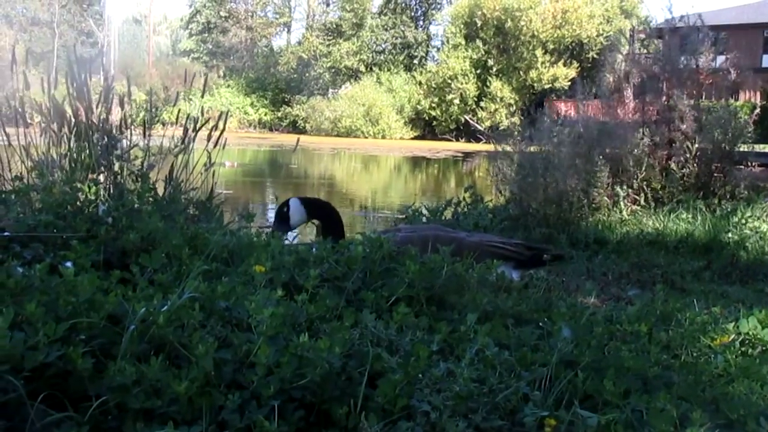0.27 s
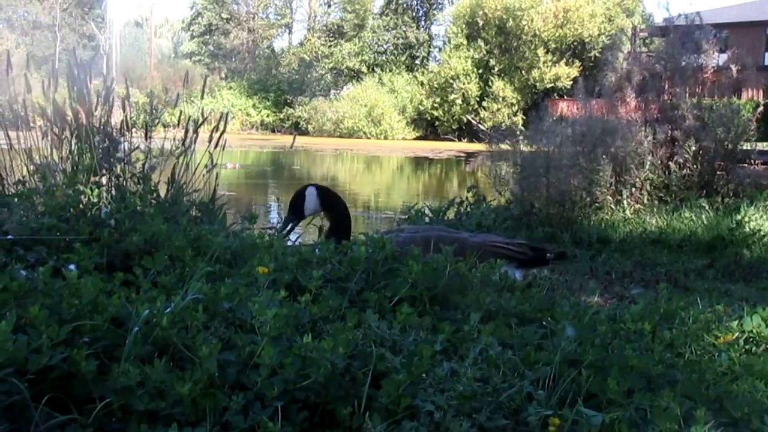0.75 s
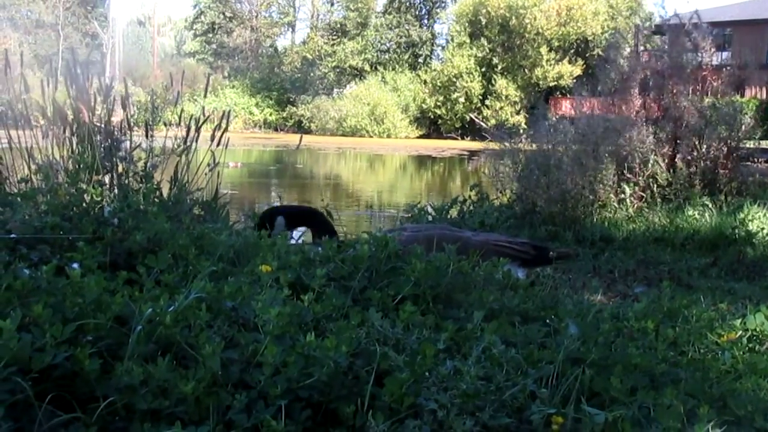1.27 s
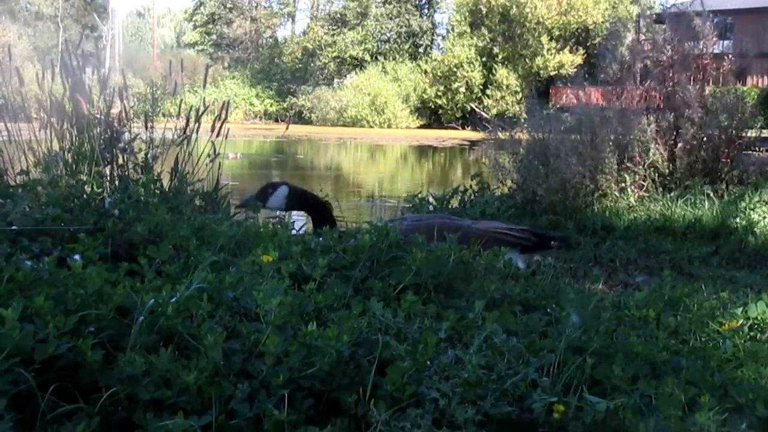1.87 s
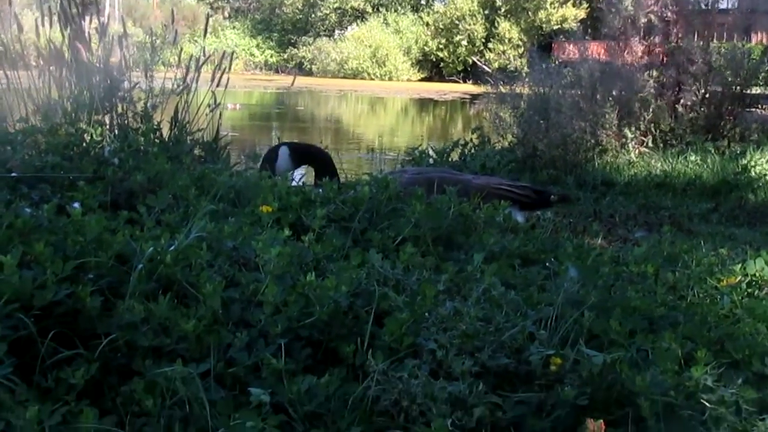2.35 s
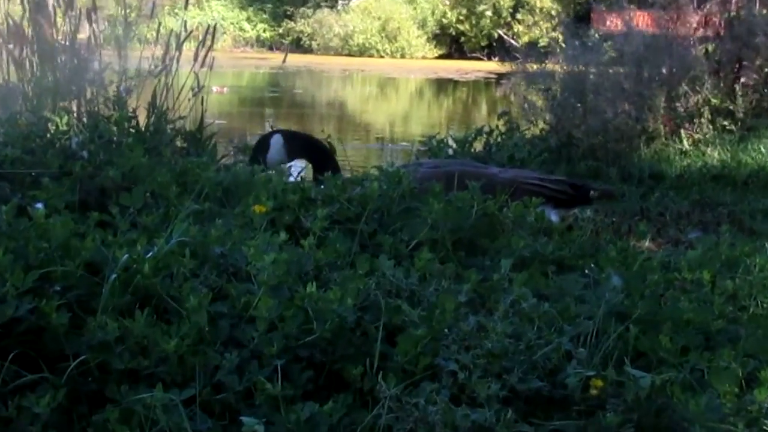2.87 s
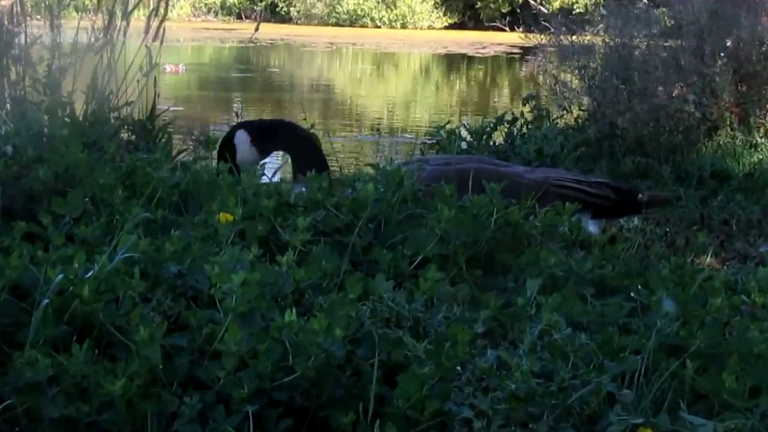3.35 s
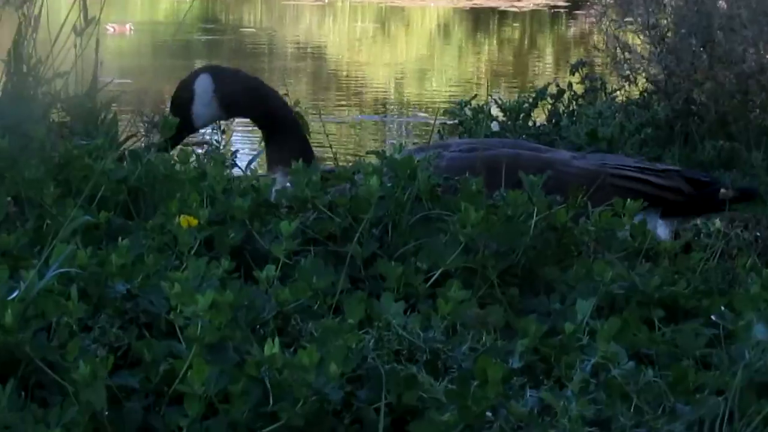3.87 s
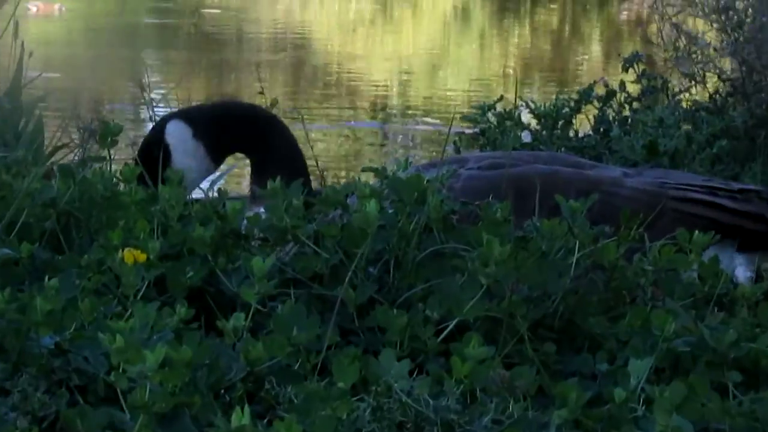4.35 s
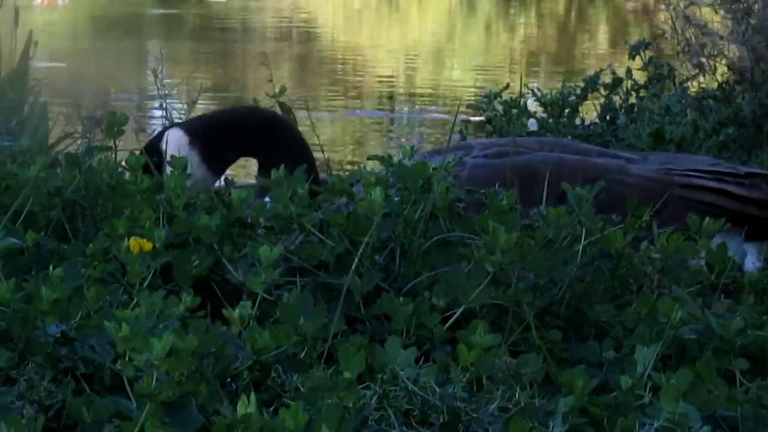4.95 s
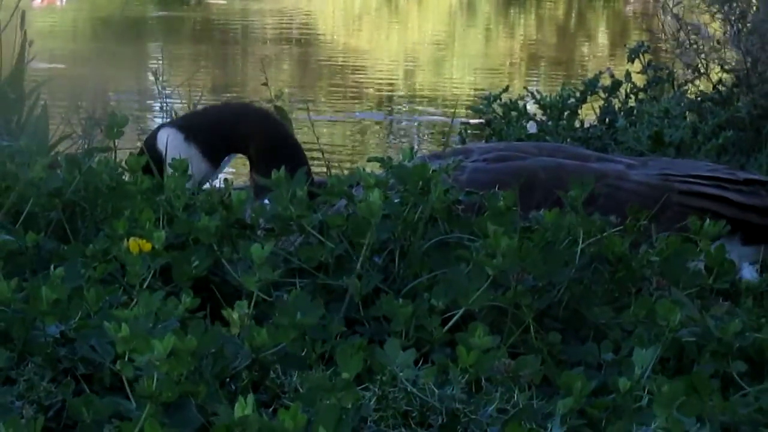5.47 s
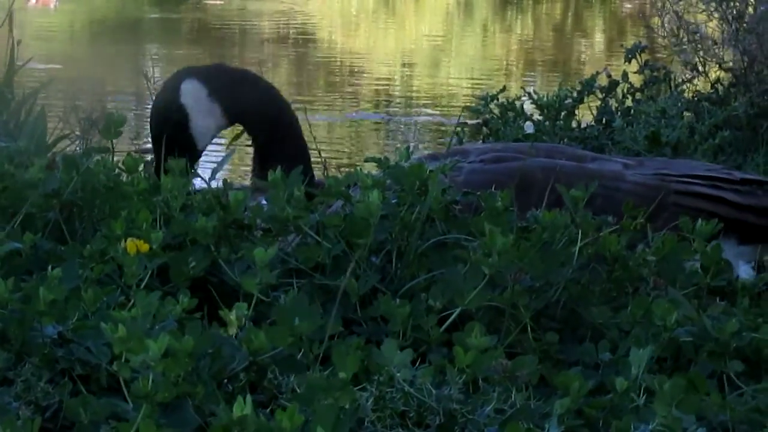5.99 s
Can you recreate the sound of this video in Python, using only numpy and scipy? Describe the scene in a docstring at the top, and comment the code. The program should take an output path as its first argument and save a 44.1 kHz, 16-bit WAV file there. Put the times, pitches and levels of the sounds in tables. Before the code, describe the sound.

Beside a pond, a far engine drones low and steady, creeping up in pitch over road rumble, leaves and hiss. A goose tears grass in tiny crackles. Around two seconds a finger brushes and clicks the camera, and its zoom motor buzzes faintly for two seconds. The engine drops in pitch, and wind finally thumps the left microphone.

```python
"""An engine drones far away, climbs slowly and drops its speed: two sine tones locked to one speed curve.
Wind bumps two microphone ports as drifting noise and ends in a hard gust on the left that ducks the limiter.
A finger brushes the camera (hiss), knocks the zoom lever (ringing bursts); the zoom motor buzzes for two
seconds (pulsed, resonant noise). A goose grazes: small crackly bursts of bright noise.
Behind lie traffic wash, leaves, low road rumble and a thin hiss, all shaped noise."""
import sys
import numpy as np
from scipy import signal
from scipy.fft import rfft, irfft
from scipy.io import wavfile
from scipy.ndimage import map_coordinates

SR = 44100
rng = np.random.default_rng(int(sys.argv[2]) if len(sys.argv) > 2 else 0)


def put_to_file(sound):
    """Save the sound as 16-bit audio at rate SR, in the file named by the first command-line argument."""
    columns = np.atleast_2d(sound).T  # one column per channel
    safe = np.clip(columns, -1, 1)
    whole_steps = np.round(safe * 32767)
    wavfile.write(sys.argv[1], SR, whole_steps.astype(np.int16))


N = 274302
TIME, FREQ = np.arange(N) / SR, np.fft.rfftfreq(N, 1 / SR)  # seconds, Hz

# How alike the two ports hear far sound. Each row: frequency in Hz, likeness from 0 to 1.
PORT_LIKENESS = [(30, 1), (130, 0.96), (300, 0.8), (640, 0.65), (1400, 0.32), (3000, 0), (15000, 0.2)]


def engine():
    """Two exhaust orders follow one speed and fade in the moving air; steadier machines hum behind."""
    # Main drone as the air carries it. Each row: time in seconds, level in dB.
    drone_points = [(.35, -29), (.55, -35.5), (1.4, -32), (2.15, -25.5), (2.55, -32), (3.25, -32.5),
                    (3.5, -39), (3.65, -27), (4.3, -32.5), (4.7, -28), (5.05, -30.5), (6.1, -35)]
    # Lower exhaust order. Each row: time in seconds, level in dB.
    lower_points = [(1.4, -47.5), (2.2, -30), (2.9, -44), (3.9, -29), (4.4, -34), (5.4, -30)]
    # Other machinery far off. Each row: pitch in Hz, early level in dB, late level in dB.
    far_tones = [(39, -47, -48), (111, -43, -48), (157, -56, -41), (230, -56, -46)]
    lower_ratio = 0.635  # pitch of the lower order against the main drone

    speed_wobble = 1 + 0.003 * wander(12)
    turns = np.cumsum(engine_hz() * speed_wobble) / SR
    drone_db = curves(drone_points)[0] + 0.9 * wander(7)
    lower_db = curves(lower_points)[0] + 2.95 * wander(6.4)
    out = amp(drone_db) * np.sin(2 * np.pi * turns)
    out += amp(lower_db) * np.sin(2 * np.pi * turns * lower_ratio)
    for tone_hz, early_db, late_db in far_tones:
        phase = 2 * np.pi * tone_hz * TIME + 0.7 * wander(2.4)
        tone_db = np.interp(TIME, [3.4, 4.4], [early_db, late_db]) + 2.5 * wander(3)
        out += amp(tone_db) * np.sin(phase)
    return out * pan(0.99)


def engine_hz():
    """Pitch of the main drone: a steady climb, then throttled back to coast down towards idle."""
    start_hz, climb_hz_per_s, idle_hz = 142.6, 5.5, 120.96
    throttle_s, coast_s, coast_shape = 3.74, 0.31, 2.3
    climb = start_hz + climb_hz_per_s * np.minimum(TIME, throttle_s)
    coasted = np.maximum(TIME - throttle_s, 0) / coast_s
    return idle_hz + (climb - idle_hz) / (1 + coasted ** coast_shape)


def wind():
    """Eddies drift past each port, sucking harder than they push; each port leaks inverted into the other."""
    # Colour of the eddies before they drift. Each row: frequency in Hz, density in dB per Hz.
    eddy_spectrum = [(12, 3), (45, -2), (110, 1), (180, -6.5), (300, -15.5), (500, -38.5), (1000, -40),
                     (2500, -72), (8000, -95)]
    # Hardest buffets on the left port. Each row: time in seconds, pressure in dB, half width in seconds.
    hard_buffets = [(5.778, -7, .0024), (5.845, -9, .0008), (5.95, -3, .0021), (5.9812, 5.5, .0016),
                    (6.074, 0, .0012), (6.0805, -8, .0004), (6.088, -1, .0007), (6.135, -8, .0006),
                    (6.145, -3, .001)]
    # smaller buffets come by chance while the wind on the left port is above the onset
    small_per_s, onset_db, small_db, small_width_s = 22, -19, -15, 0.001
    skew, leak = 0.21, 0.29

    pressure, speed = gusts()
    place = np.cumsum(speed)  # faster eddies read through the noise quicker, so they sound higher
    eddies = []
    for _ in range(2):
        still = noise(amp(read(eddy_spectrum)))
        eddies.append(map_coordinates(still, [place], order=3, mode="wrap"))
    flow = unit(np.tanh(np.array(eddies) / 3))
    flow = flow - skew * (flow ** 2 - 1)
    lumps = unit(amp(4.0 * np.tanh(wander(25))))
    ports = flow * pressure * lumps

    for s, db, width in hard_buffets:
        ports[0] += amp(db) * buffet(TIME - s, width)
    strong = pressure[0] > amp(onset_db)
    hits = (rng.random(N) < small_per_s / SR) * strong * rng.uniform(0.5, 1, N)
    small = buffet(np.arange(-0.01, 0.01, 1 / SR), small_width_s)
    ports[0] += amp(small_db) * signal.oaconvolve(hits, small, "same")
    return ports - leak * ports[::-1]


def gusts():
    """Each gust swells and dies over the light wind: pressure at both ports, and the speed of the eddies."""
    # Each row: centre in seconds, half length in seconds, level in dB, left minus right in dB,
    # eddy speed factor.
    gust_rows = [(0.162, 0.048, -23, -12.5, 0.61), (0.419, .1, -35, -10, 0.69),
                 (.79, 0.099, -23.5, -14.5, 0.76), (1.87, 0.076, -32, -8, 0.61), (2.08, .09, -36, 8, 0.58),
                 (3.761, .1, -38, 12, 0.52), (4.15, .05, -34, -17.5, 1.15), (5.089, 0.034, -26.5, 14, .7),
                 (5.25, 0.059, -27, -1, 0.69), (5.539, 0.139, -26.5, 8, 0.74),
                 (5.781, 0.056, -16.5, 6.5, 1.15), (5.94, 0.073, -18.5, 14, 1.236),
                 (6.081, .03, -16, 14.5, 1.59), (6.18, 0.072, -21, 14.5, 1.3)]
    calm_db, calm_side_db, calm_eddies = -43, 5, 0.6  # light wind between the gusts

    power = (amp(calm_db) * pan(calm_side_db)) ** 2 * np.ones(N)
    drift = calm_eddies * power.sum(0)
    for s, length, db, side_db, eddies in gust_rows:
        swell = np.exp(-((TIME - s) / length) ** 2)
        gust = (amp(db) * pan(side_db)) ** 2 * swell
        power = power + gust
        drift = drift + eddies * gust.sum(0)
    return np.sqrt(power), drift / power.sum(0)


def buffet(age, width):
    """One sharp eddy: a short suck between two weak pushes."""
    u = age / width
    return (u ** 2 - 1) * np.exp(-u ** 2 / 2)


def zoom():
    """A stepping motor rattles its gears at each step, strong and weak in turn; the body rings."""
    # Gear noise. Each row: frequency in Hz, density in dB per Hz, relative to the rings below.
    gear_spectrum = [(300, -28), (900, 3.5), (1400, 10.5), (2200, 3), (2850, -3), (3500, 1.5), (4850, -7),
                     (5500, 2.5), (9000, 2.5), (10300, -7), (13000, -9), (16000, -23)]
    # Rings of the camera body. Each row: pitch in Hz, width in Hz, relative left level in dB,
    # relative right level in dB.
    body_rings = [(2510, 115, -38, 8.5), (4050, 260, 5.5, 0), (5890, 300, 6, 8), (7230, 200, -1, 15.5),
                  (8500, 240, -8, 7), (9400, 380, 5.5, 1), (11100, 320, -4, 5.5), (12800, 330, 4, 10.5)]
    step_hz, decay_s, steady, uneven = 150, 0.0017, 0.47, 0.11
    from_s, to_s, ramp_s, level_db = 2.395, 4.36, 0.022, -52.5

    steps = TIME * step_hz
    since_step_s = (steps % 1) / step_hz
    pulses = steady + np.exp(-since_step_s / decay_s)
    pulses *= 1 + uneven * np.cos(np.pi * np.floor(steps))
    pulses *= 1 + 0.1 * np.cos(np.pi * steps / 3)  # a slower swell every six steps
    power = np.tile(amp(read(gear_spectrum)) ** 2, (2, 1)) * pan(0.66) ** 2
    for hz, width_hz, left_db, right_db in body_rings:
        peak = 1 / (1 + ((FREQ - hz) / width_hz) ** 2) ** 2
        power += amp([[left_db], [right_db]]) ** 2 * peak
    pulsed_noise = pulses * rng.standard_normal((2, N))
    buzz = irfft(rfft(pulsed_noise) * np.sqrt(power), N)
    return amp(level_db) * gate(from_s, to_s, ramp_s) * unit(buzz)


def knocks():
    """Each knock is a short crack and one broad plastic resonance; it sets the case ringing faintly."""
    # Finger and zoom lever. Each row: start in seconds, relative level in dB, ring in Hz, decay in seconds,
    # left minus right in dB, dry crack beside the ring in dB.
    knock_rows = [(2.0452, -7, 2302, 0.00075, -11.5, -3), (2.2119, -27.5, 2386, 0.0023, -8, -31),
                  (2.232, -24, 1270, .0025, -6, -22), (2.269, -9, 2970, .0012, -6, -22.5),
                  (2.401, -37, 10120, .01, 1.5, -2), (2.413, -22.5, 1470, 0.0042, -10.5, -15),
                  (2.4453, -13, 6050, 0.0013, -7.5, -2), (2.461, -18, 900, 0.0024, -6.5, -33),
                  (2.469, -11, 1700, 0.0023, -10, -18), (2.473, -19.5, 880, .005, -12, -23),
                  (4.316, -27, 980, 0.0092, -9.5, -27), (4.329, -26, 1670, 0.0034, -9, -2),
                  (4.506, -34.5, 4020, .0027, 0, -27), (4.509, -33.5, 1426, .011, -7, -35),
                  (4.533, -38, 6000, 0.0019, 3, -30)]
    sharpness, dull_hz, level_db = 2.3, 14000, -6
    case_hz, case_db, case_decay_s = 3900, -20, 0.02

    size = 8192  # samples per knock
    t = np.arange(size) / SR
    hz = np.fft.rfftfreq(size, 1 / SR) + 1
    out = np.zeros((2, N))
    case = amp(case_db) * np.exp(-t / case_decay_s) * np.sin(2 * np.pi * case_hz * t)
    for s, db, ring_hz, decay, side_db, crack_db in knock_rows:
        ring = 1 / (1 + (sharpness * (hz / ring_hz - ring_hz / hz)) ** 2)
        colour = ring + amp(crack_db) / (1 + (hz / dull_hz) ** 2)
        shape = np.exp(-t / decay) * (1 - np.exp(-t / 0.0001))
        burst = shape * irfft(rfft(rng.standard_normal((2, size))) * colour)
        burst *= np.linalg.norm(shape) / np.linalg.norm(burst, axis=1, keepdims=True)
        burst += np.interp(case_hz, hz, ring) * case  # knocks near its pitch ring the case most
        first = round(s * SR)
        out[:, first:first + size] += amp(db + level_db) * pan(side_db) * burst
    return out


def rattle():
    """A dull rattle dies away in the case after the lever's clack."""
    start_s, level_db, decay_s, top_hz = 2.475, -41.5, 0.076, 3800
    level = amp(level_db) * (TIME > start_s) * np.exp(-abs(TIME - start_s) / decay_s)
    dull = 1 / (1 + (FREQ / top_hz) ** 4)
    return level * np.array([noise(dull) for _ in range(2)]) * pan(-1.5)


def finger():
    """Skin hisses over the case beside the right port; each stroke bites, fades and lifts off."""
    # Skin hiss. Each row: frequency in Hz, density in dB per Hz.
    skin_spectrum = [(300, 7.5), (900, 4), (2000, 4), (3700, 4), (5000, -7), (9000, -6), (13000, -5),
                     (16000, -8)]
    # Slides of the finger. Each row: start in seconds, length in seconds, level in dB, fading in dB per second.
    slides = [(2.043, 0.081, -36.5, -58), (2.21, .14, -46.5, -18)]
    attack_s, release_s = 0.0021, 0.02

    level = np.zeros(N)
    for s, length, db, fade_db_per_s in slides:
        age = np.maximum(TIME - s, 0)
        bite = np.minimum(age / attack_s, 1)
        fade = amp(db + fade_db_per_s * np.minimum(age, length))
        lift = np.exp(-np.maximum(age - length, 0) / release_s)
        level += bite * fade * lift
    roughness = amp(2.1 * wander(150))
    return level * roughness * pair(skin_spectrum, 0.12) * pan(-9.0)


def grazing():
    """The goose tears blades of grass in small crackly clumps; one stem snaps."""
    # Torn grass. Each row: frequency in Hz, density in dB per Hz.
    tear_spectrum = [(1500, -28), (4500, -14), (6500, -4), (8800, 2), (12000, -3), (16000, -5.5)]
    # Tears of grass. Each row: centre in seconds, level in dB, half length in seconds.
    tear_rows = [(0.312, -57, .02), (.38, -57, 0.014), (.472, -58, 0.0076), (.557, -53, .013),
                 (0.636, -51.5, 0.0067), (0.769, -54.5, 0.016), (1.887, -61, .049), (3.798, -52.5, .015),
                 (4.455, -60, .01), (5.148, -56.5, 0.02), (5.807, -54, .012)]
    snap_s, snap_db, snap_decay_s = 0.5595, -33, 0.0012

    power = np.zeros(N)
    for s, db, length in tear_rows:
        power += amp(db) ** 2 * np.exp(-((TIME - s) / length) ** 2)
    crackle = unit(amp(3 * wander(550)))
    snap = amp(snap_db) * (TIME > snap_s) * np.exp(-abs(TIME - snap_s) / snap_decay_s)
    return (np.sqrt(power) * crackle + snap) * pair(tear_spectrum, 0.52) * pan(4)


def air():
    """Tyre wash and rustling leaves from the left, over a thin steady hiss."""
    # Three spectra. Each row: frequency in Hz, density in dB per Hz.
    wash_spectrum = [(200, -3), (450, -2.5), (600, 1.5), (780, -2.5), (1050, 1.5), (1600, -6),
                     (2200, -10.5), (3000, -25.5), (5000, -42), (9000, -59)]
    leaf_spectrum = [(1000, 1.5), (2000, 2.5), (3000, 0.5), (3500, -1.5), (3900, 0.5), (4400, -4.5),
                     (5200, -8), (7000, -10.5), (10000, -16), (15000, -52)]
    hiss_spectrum = [(100, 10), (3500, 0.5), (5500, -3), (7500, -0.5), (7900, -4.5), (8300, 1),
                     (11000, -2.5), (16000, -5)]
    # Slow swells, before the hush. Each row: time in seconds, traffic wash in dB, rustle of leaves in dB.
    swells = [(0, -48.5, -57.5), (1.3, -49.5, -57), (2.2, -45, -53.5), (3, -49.5, -61), (4.8, -45, -51.5),
              (5.85, -43.5, -52), (6.2, -51.5, -58.5)]
    hush_wash_db, hush_leaves_db = -6.5, -19

    hush = gate(2.51, 4.52, 0.12)  # far air is hushed for most of the zoom
    wash_db, leaves_db = curves(swells) + np.outer([hush_wash_db, hush_leaves_db], hush)
    wash_level = amp(wash_db + 0.87 * wander(4.2))
    leaf_level = amp(leaves_db + 1.46 * wander(13.4))
    alike = read(PORT_LIKENESS)
    wash = wash_level * pair(wash_spectrum, alike, lag_s=0.00026) * pan(1.96)
    leaves = leaf_level * pair(leaf_spectrum, alike, lag_s=0.00027) * pan(5.7)
    return wash + leaves + amp(-60) * pair(hiss_spectrum, 0.033)


def rumble():
    """Low roar of far roads, nearly the same at both ports."""
    # Each row: frequency in Hz, density in dB per Hz.
    road_spectrum = [(15, -30), (28, -50), (42, 0.5), (65, -1.5), (105, 3.5), (170, -1.5), (220, -6.5),
                     (320, -10.5), (450, -21), (700, -32), (1500, -47), (4000, -76)]
    level = amp(-33.3 + wander(7.3))
    return level * pair(road_spectrum, read(PORT_LIKENESS)) * pan(0.48)


def amp(db):
    """Decibels to gain."""
    return 10 ** (np.asarray(db) / 20)


def unit(x):
    """Scales to rms 1."""
    return x / np.sqrt(np.mean(x ** 2) + 1e-20)


def curves(rows):
    """Each column of a table, drawn through time."""
    s, *columns = np.transpose(rows)
    return np.array([np.interp(TIME, s, c) for c in columns])


def read(points):
    """A spectrum table at every frequency."""
    hz, value = np.transpose(points)
    return np.interp(np.log(FREQ + 1), np.log(hz), value)


def noise(gain):
    """Noise of rms 1 with its spectrum shaped by the given gain at each frequency."""
    return unit(irfft(rfft(rng.standard_normal(N)) * gain, N))


def wander(hz):
    """Random drift of rms 1, rolling off above the given rate."""
    return noise(1 / (1 + (FREQ / hz) ** 4))


def pan(db):
    """Gains of the two ports for a left-minus-right level."""
    return amp([[db / 2], [-db / 2]])


def pair(spectrum, alike, lag_s=0):
    """Coloured noise at two ports: partly shared, the right one hearing it later by the lag."""
    left, other = rfft(rng.standard_normal((2, N)))
    shared = np.clip(alike, -1, 1)
    right = shared * left + np.sqrt(1 - shared ** 2) * other
    right = right * np.exp(-2j * np.pi * FREQ * lag_s)
    return unit(irfft(np.array([left, right]) * amp(read(spectrum)), N))


def gate(start, stop, ramp):
    """Rises from 0 to 1 after start and falls back after stop."""
    return np.clip((TIME - start) / ramp, 0, 1) - np.clip((TIME - stop) / ramp, 0, 1)


def scene():
    """Far sounds, wind, the grazing goose and the noises of the camera itself."""
    dip_db = -10 * gate(2.372, 2.453, 0.02)  # the low sounds dip briefly around the start of the zoom
    low = (engine() + rumble()) * amp(dip_db)
    return low + wind() + zoom() + knocks() + rattle() + finger() + grazing() + air()


def record(dry):
    """A limiter ducks a little late and recovers slowly; peaks that outrun it clip; last comes the band limit."""
    recover_db_per_s, attack_s, edge_hz = 6, 0.00074, 15900
    over_db = 20 * np.log10(np.maximum(abs(dry).max(0), 1))
    fall = TIME * recover_db_per_s
    held_db = np.maximum.accumulate(over_db + fall) - fall
    keep = np.exp(-1 / (attack_s * SR))
    duck_db = signal.lfilter([1 - keep], [1, -keep], held_db)
    limited = np.clip(dry * amp(-duck_db), -1, 1)
    band = signal.firwin(511, edge_hz, window=("kaiser", 9), fs=SR)
    return signal.oaconvolve(limited, band[None], "same")


dry = scene()
out = record(dry)
put_to_file(out)
```